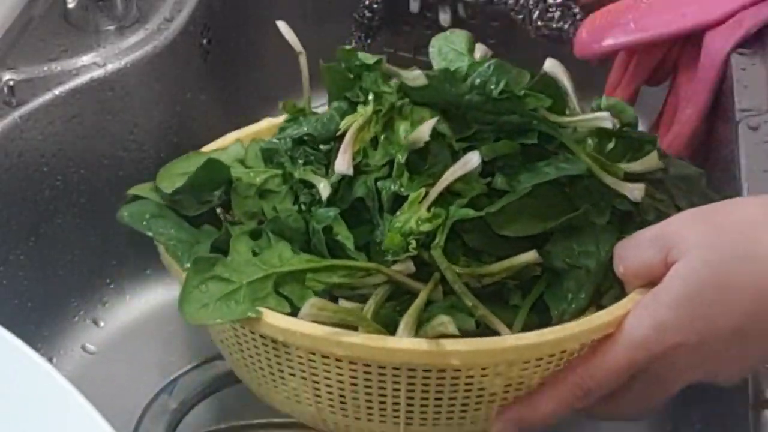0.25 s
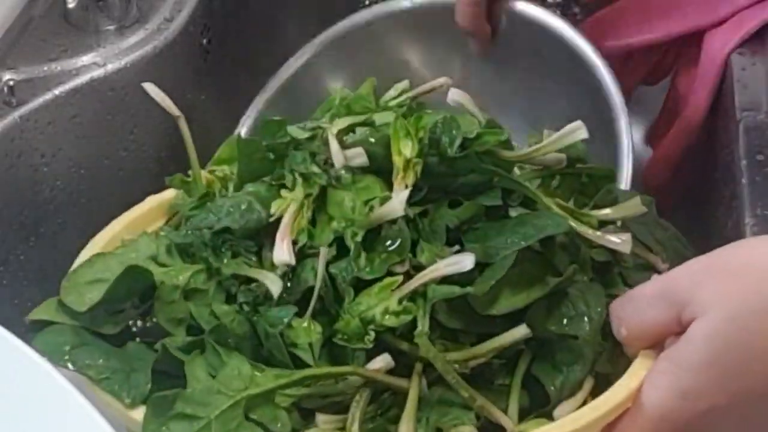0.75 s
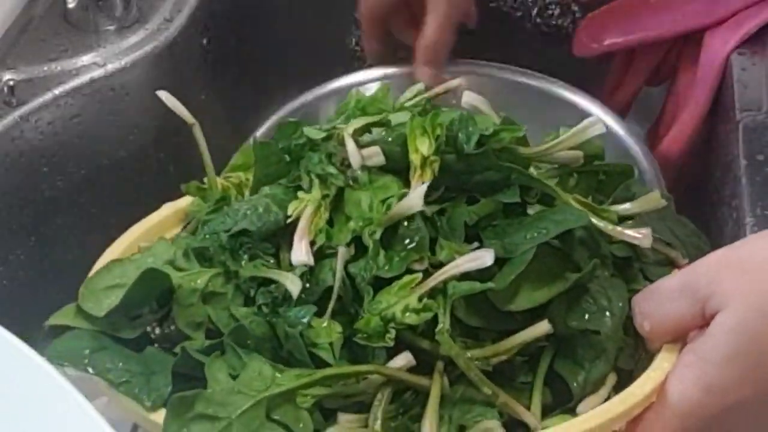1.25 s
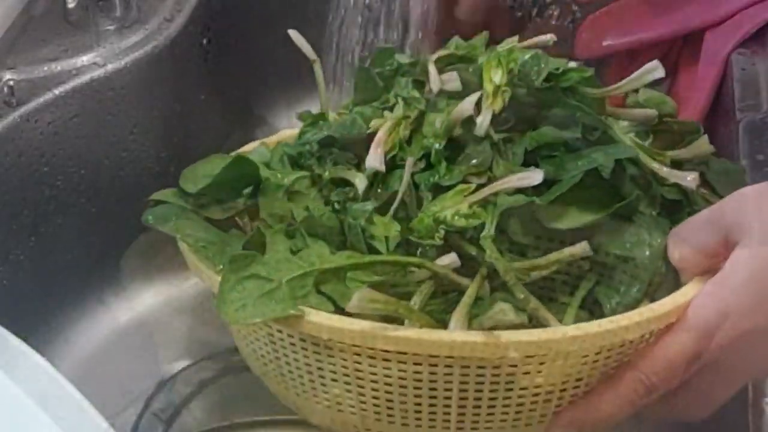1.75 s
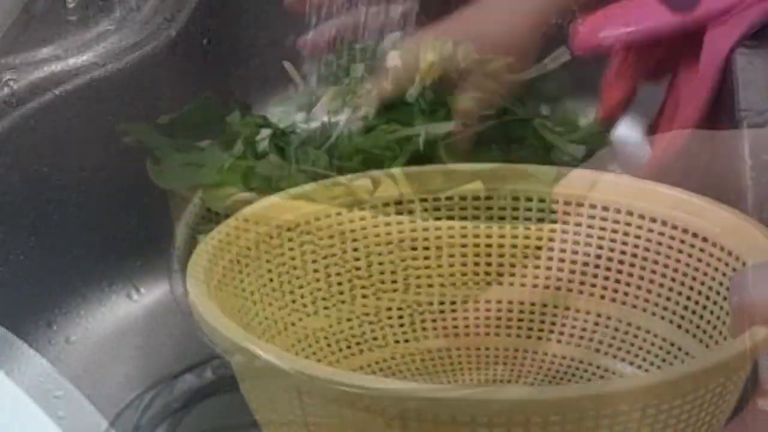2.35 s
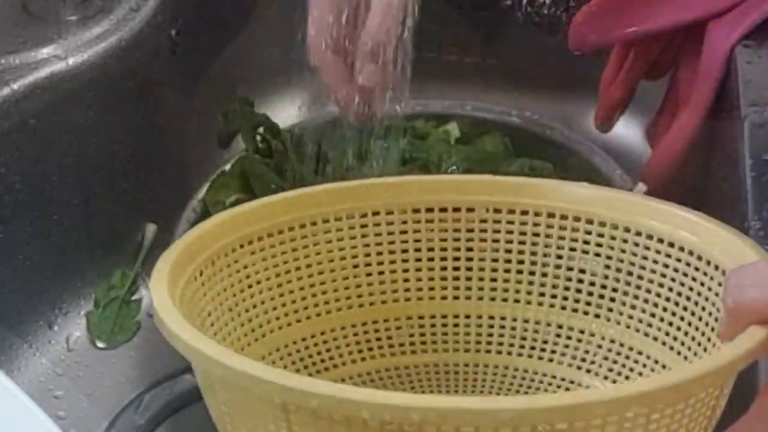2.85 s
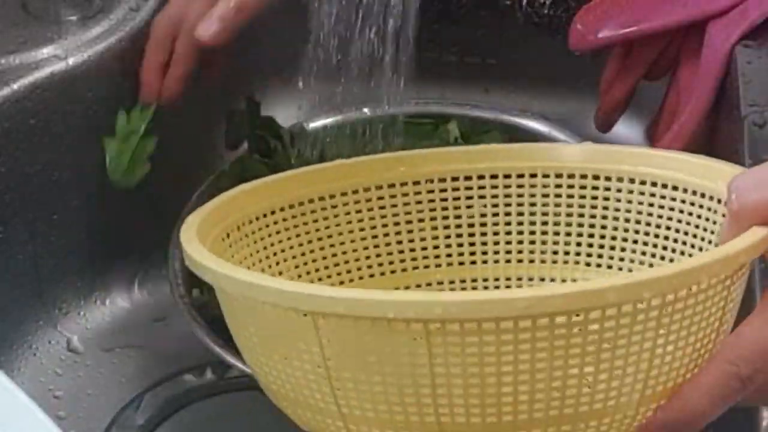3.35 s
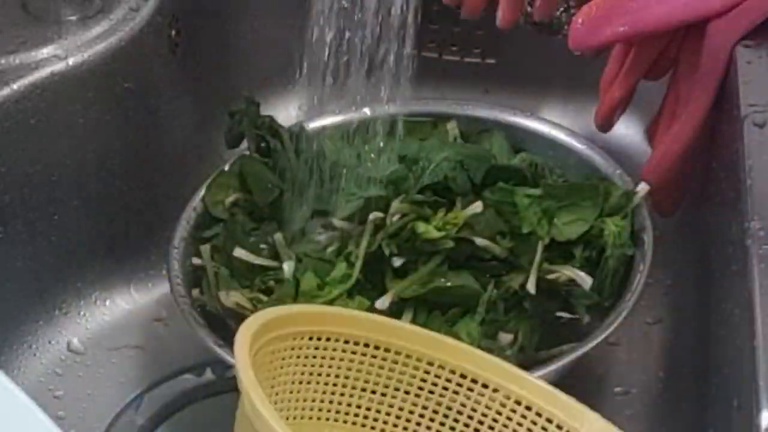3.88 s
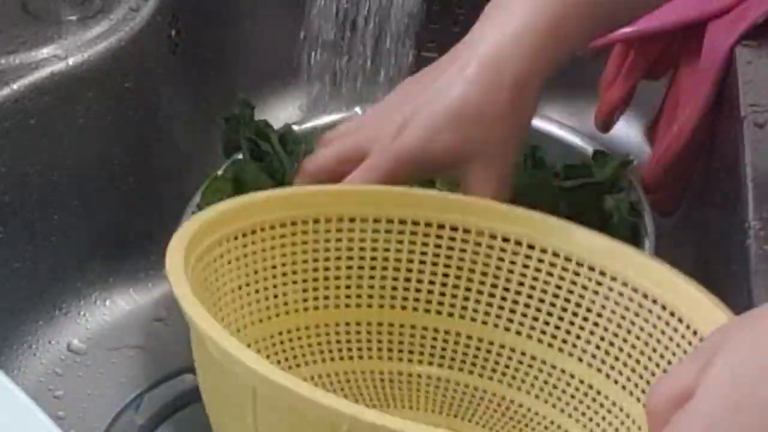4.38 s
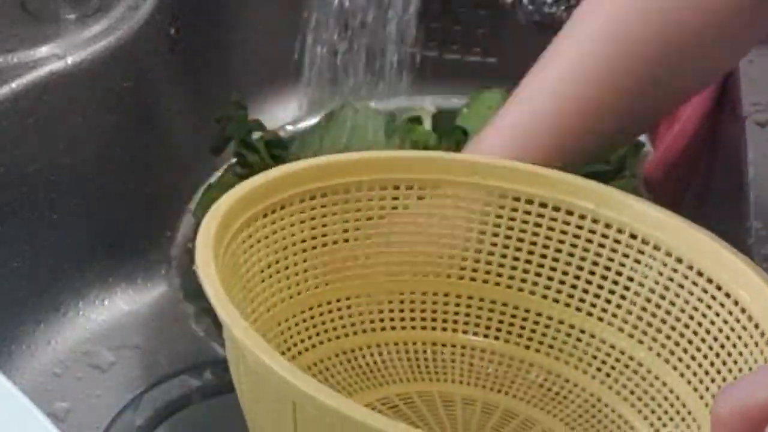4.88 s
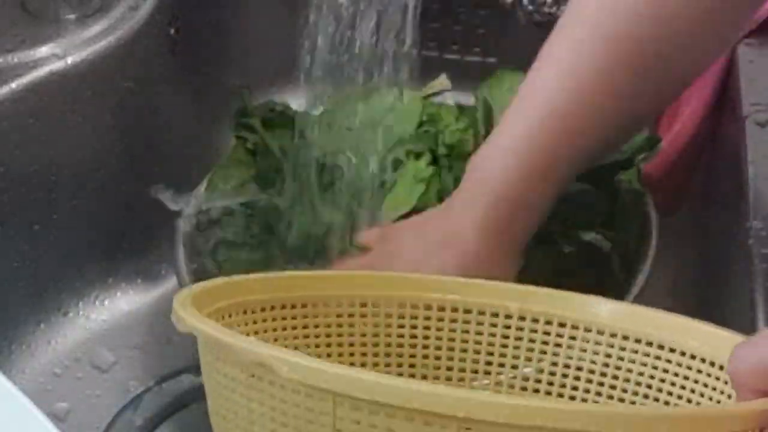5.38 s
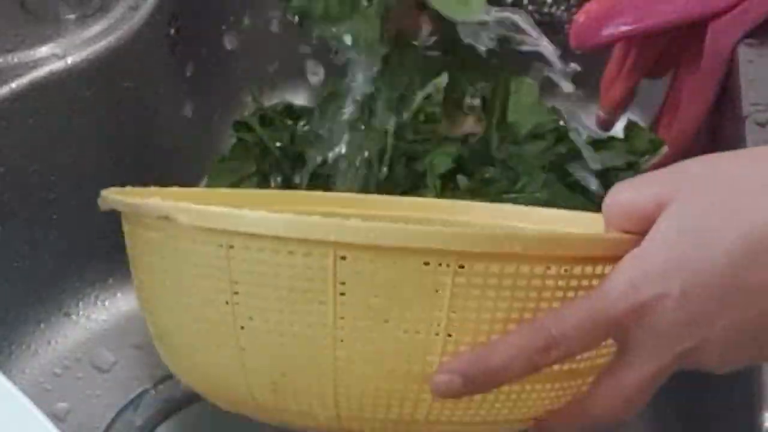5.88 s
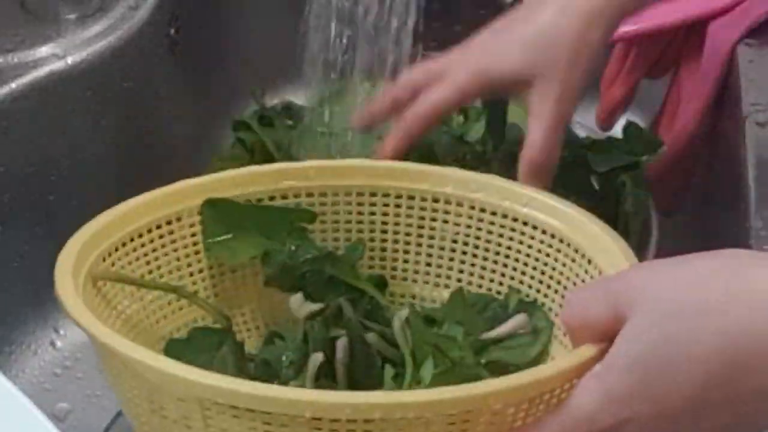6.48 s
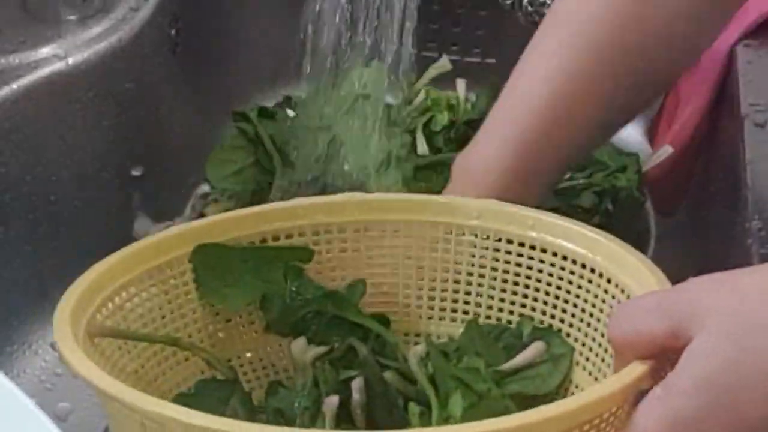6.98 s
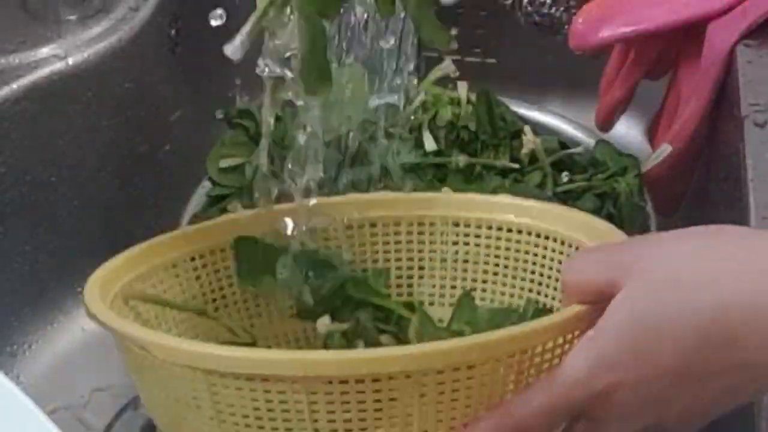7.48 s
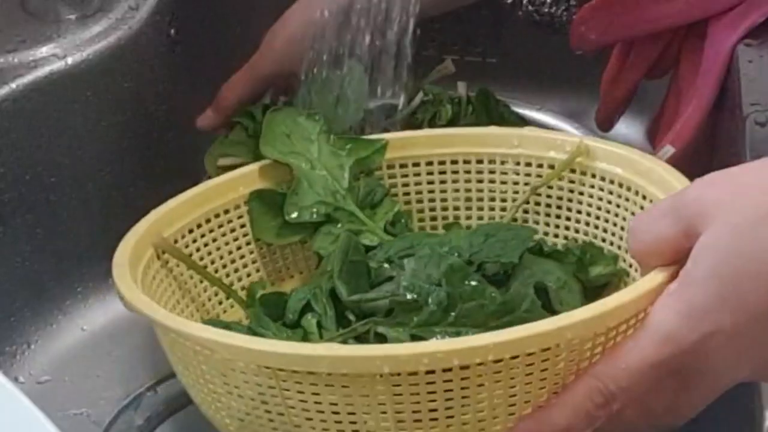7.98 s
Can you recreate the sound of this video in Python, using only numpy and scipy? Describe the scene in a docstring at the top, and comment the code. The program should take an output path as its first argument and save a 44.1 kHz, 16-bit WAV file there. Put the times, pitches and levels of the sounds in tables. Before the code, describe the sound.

Close in a kitchen sink: a splashing pour, hollow steel knocks, then steady tap spray with sloshing leaves, drips and plastic colander bumps.

```python
"""Kitchen: a tap sprays on leafy vegetables in a steel sink, close to a pair of microphones.
A steel bowl is tipped out and set down; then the spray runs, a hand stirs and lifts the leaves,
and the plastic colander drags and knocks on the basin, which booms under everything.
Water is shaped noise plus bursting bubbles; the steel is a bank of decaying modes; the squeak is a gliding tone."""
import sys
import numpy as np
from scipy import signal
from scipy.fft import rfft, irfft
from scipy.io import wavfile
from scipy.ndimage import uniform_filter1d

SR = 44100
rng = np.random.default_rng(int(sys.argv[2]) if len(sys.argv) > 2 else 0)


def output_pcm(signal):
    """Save a mono or channel-first signal as 16-bit PCM at the path in sys.argv[1].

    Samples are clipped to [-1, 1] before scaling.
    """
    pcm = np.clip(np.atleast_2d(signal).T, -1, 1) * 32767
    wavfile.write(sys.argv[1], SR, np.round(pcm).astype(np.int16))


def gain_from_db(level_db):
    """Convert decibel levels to linear amplitude factors (20 dB per decade)."""
    decades = np.asarray(level_db, float) / 20
    return 10 ** decades


N = 363384

# quiet hum of the kitchen: (frequency [Hz], level [dB])
ROOM_COLOUR = [(20, 2), (160, -13), (300, -18.5), (450, -30.5), (850, -28), (1250, -71), (6700, -44),
               (16000, -41)]
ROOM_DB = -51
# fine spray: (frequency [Hz], level [dB])
HISS_COLOUR = [(800, -25.5), (1500, -12.5), (3400, -6), (7200, -9.5), (8500, -3.5), (10000, -4.5),
               (13000, -4.5), (16000, -11)]
# sloshing and bubbling water: (frequency [Hz], level [dB])
SLOSH_COLOUR = [(150, -1), (400, 2), (900, -7.5), (1500, -6), (3000, -5), (5000, -7), (9000, -12.5),
                (16000, -13)]
# stereo likeness of noise: (frequency [Hz], left-right correlation [-1..1])
STEREO_LIKENESS = [(60, 1), (180, 0.9), (550, 0.82), (1650, 0.68), (4970, -0.11), (15000, 0.036)]
# microphone colour: (frequency [Hz], left over right [dB])
LEFT_OVER_RIGHT = [(60, -2), (180, -1.5), (550, 2.5), (1650, 1), (4970, 1), (15000, -2)]
TOP_EDGE_HZ = 15850  # top edge of the band: nothing sounds above it

# steel basin modes: (frequency [Hz], relative level [dB], t60 [s])
BASIN_MODES = [(43, -8, 0.079), (74, -0.5, 0.095), (99.6, 2.5, 0.19), (131.4, -1, 0.13),
               (159.4, -6.5, 0.058), (230, -1, 0.098), (300, 2, 0.096), (342, -3.5, 0.14),
               (416.7, 3.5, 0.067), (469, -2, 0.13), (593, 7.5, 0.029), (740, 1, 0.092), (870, 1.5, 0.039),
               (1092, -12.5, 0.15)]
DEEP_HZ, SWING_CYCLES = 190, 0.3  # modes below DEEP_HZ are the deep ones; time constant of the swing-up
# knocks on the basin, and deep booms that ring on after them:
# (time [s], level [dB], deep modes over the others [dB], favoured frequency [Hz])
KNOCKS = [(0.733, -20.5, -13, 258), (0.771, -15, -14, 190), (0.813, -17, -11.5, 198),
          (0.934, -28, -28, 424), (0.984, -21.5, -10, 228), (1.014, -17.5, -6, 289), (1.021, -22.5, 7, 300),
          (1.129, -29, -15, 430), (1.387, -21, -1, 275), (1.41, -37.5, 8, 300), (1.443, -43, 12.5, 300),
          (1.959, -24, -5, 376), (2.033, -22.5, -14, 204), (3.046, -15.5, -22, 300),
          (3.287, -28.5, -9, 444), (3.682, -19.5, -14, 318), (3.69, -21.5, -27, 400),
          (3.777, -25, -0.5, 366), (3.833, -29.5, -1, 221), (3.896, -14, -2.5, 398),
          (4.613, -29.5, -3, 225), (4.63, -29.5, 1.5, 348), (5.103, -32.5, -5, 496),
          (6.249, -37.5, -9, 282), (6.447, -30, -27, 270), (6.906, -26, -16, 240), (7.63, -34, -15, 293),
          (8.15, -27, -8.5, 210)]
# colander dragged over the steel: (time [s], level [dB])
DRAG_LEVEL = [(2.8, -46), (2.85, -25.5), (2.99, -30.5), (3.06, -23), (3.085, -51)]
# wet skin squeaks on plastic, sliding up in pitch
SQUEAK_S, SQUEAK_LENGTH_S, SQUEAK_DB, SQUEAK_HZ, SQUEAK_SLIDE_HZ = 4.618, 0.021, -25, 2286, 690

# drips and large air bubbles: (time [s], level [dB], pitch [Hz])
PLOPS = [(.028, -40, 1030), (0.034, -35.5, 1800), (0.044, -34, 4180), (.116, -37.5, 1350),
         (0.123, -42, 970), (0.176, -39, 3870), (0.242, -32.5, 2800), (.3, -33.5, 1850), (0.305, -39, 1140),
         (0.372, -35, 3420), (.708, -47, 1480), (1.128, -30.5, 430), (1.163, -22.5, 870), (1.179, -22, 696),
         (1.24, -27, 740), (1.2564, -26, 1050), (1.432, -42, 1330), (1.463, -35, 4200), (1.56, -42, 1410),
         (2.362, -29, 873), (5.134, -32.5, 1530), (5.212, -30.5, 1700), (5.652, -37, 1470),
         (6.701, -32, 1600), (6.845, -35, 2240), (7.057, -31, 5800), (7.075, -38, 654), (7.187, -27, 1360),
         (7.26, -39.5, 496), (7.289, -29, 1120), (7.38, -32, 870), (7.395, -31, 2600), (8.058, -34, 3980)]
# sheets of water slapping down: (time [s], level [dB], treble over the middle [dB], fade t60 [s])
SPLASHES = [(0.0288, -38, -18, 0.03), (0.047, -45, 9, 0.029), (0.1, -50, 18, 0.021),
            (0.1344, -44, -14, 0.14), (0.17, -36, -0.5, 0.068), (0.234, -37, 0, 0.051),
            (0.2992, -48, 7.5, 0.15), (0.3526, -48, 4.5, 0.09), (0.729, -25, 6.5, 0.045),
            (0.765, -30.5, 5, 0.076), (0.807, -14, -2.5, 0.066), (0.879, -19, -25, 0.051),
            (0.9165, -28, 2, 0.056), (0.9616, -29.5, 7, 0.068), (0.983, -18.5, -13, 0.13),
            (1.011, -8, 1, 0.032), (1.152, -28, -5, 0.2), (1.255, -25, 0, 0.022), (1.366, -25, -4.5, 0.15),
            (1.384, -21, -26, 0.069), (1.4626, -46, 5.5, 0.08), (1.562, -41, 1, .06),
            (1.5823, -38.5, 6, 0.068), (1.947, -34.5, 1, 0.36), (2.068, -36.5, -6, 0.51),
            (2.35, -34.5, -15, 0.19), (2.74, -34, -14, 0.31), (3.676, -25, -12, 0.065),
            (3.775, -24, -3, 0.086), (3.891, -15.5, -20, 0.045), (4.621, -36.5, -2, 0.52),
            (5.63, -35, -8, 0.13), (6.87, -30.5, 9.5, 0.074)]
SPLASH_RISE_S, SHEET_DB = 0.01, -25  # rise time constant of a sheet at SHEET_DB
SWELL_PER_DB = 0.57  # a bigger sheet swells more slowly: dB of rise time per dB above SHEET_DB
SPLASH_HOLD = 1.195  # power of time in the fade: above 1 the sheet holds, then breaks up
# single drops cracking on steel: (time [s], level [dB])
TICKS = [(0.3974, -26), (2.177, -25.5), (2.338, -37), (6.876, -48)]
TICK_T60_S = 0.024

# running water: (time [s], spray hiss [dB], sloshing and trickling [dB])
WATER_LEVELS = [(1.56, -60, -70), (1.58, -48, -43), (1.65, -34.5, -38), (1.85, -39, -43.5),
                (2.2, -35, -40.5), (2.43, -35.5, -34), (2.75, -36.5, -40), (2.83, -40, -39),
                (3.27, -46.5, -47), (3.62, -42.5, -47), (3.86, -42.5, -45), (4.2, -44.5, -52.5),
                (4.39, -39.5, -43), (4.58, -44.5, -46), (4.82, -41.5, -44), (5.03, -37.5, -38),
                (5.67, -36, -37), (6.0, -37, -48), (6.23, -36, -49), (6.35, -34, -42), (6.72, -36, -39),
                (7.06, -37, -38), (7.3, -35, -35.5), (7.58, -35.5, -39), (8.24, -35, -42)]
# water tipped from the bowl: (time [s], level [dB])
POUR_LEVEL = [(0, -49.5), (.22, -54), (.48, -64), (.54, -75), (.69, -73), (.8, -43), (1.0, -34.5),
              (1.28, -44.5), (1.35, -54.5), (1.55, -49.5)]
# falling water drums the basin: (time [s], level [dB])
DRUMMING_LEVEL = [(0, -50.5), (.7, -47.5), (.94, -32), (1.17, -46), (1.5, -40), (2.7, -43), (3.2, -51.5),
                  (3.85, -41), (4.15, -51), (5.23, -45.5), (8.24, -46.5)]
# filled bowl hums under the spray: (time [s], level [dB])
BOWL_LEVEL = [(2.5, -65), (6.25, -59.5), (6.4, -50.5), (7.4, -57), (8.24, -44)]
# notes of the filled bowl: (frequency [Hz], width [Hz], relative level [dB])
BOWL_NOTES = [(890, 100, 0), (1420, 160, -1)]
# short dips in the level of the running water: (time [s], depth [dB], half length [s])
WATER_DIPS = [(2.24, -1.5, 0.095), (2.525, -6.5, 0.062), (4.946, -8, 0.11), (5.513, -7, 0.034),
              (5.62, -8, 0.017), (5.91, -4.5, 0.16), (6.292, -19, 0.03), (6.875, -9.5, 0.13),
              (7.477, -6.5, 0.13)]
HISS_SHARE = 0.63  # the hiss dips by this share of the depth
LEAF_CUT_HZ = 720  # leaves soak up the low wash under the spray


def evened(x):
    """Scales to unit rms."""
    return x / np.sqrt(np.mean(x ** 2) + 1e-20)


def read(points, hz):
    """Interpolates a table over log frequency."""
    f, value = np.transpose(points)
    return np.interp(np.log(hz + 1), np.log(f + 1), value)


def curves(rows):
    """Each dB column as a gain over time, silent before the table and fading at 400 dB/s after it."""
    s, *columns = np.transpose(rows)
    t = np.arange(N) / SR
    fade_db = 400 * np.maximum(t - s[-1], 0)
    return [gain_from_db(np.interp(t, s, column, -200) - fade_db) for column in columns]


def add(mix, s, sound):
    """Adds a sound into the mix at s seconds, cut at the end."""
    part = mix[..., round(s * SR):][..., :sound.shape[-1]]
    part += sound[..., :part.shape[-1]]


def ringing(drive, response):
    """Convolves a drive with an impulse response, cut to N samples."""
    return signal.oaconvolve(drive, response, axes=1)[:, :N]


def highpass(x, order, hz):
    """Butterworth high-pass."""
    return signal.lfilter(*signal.butter(order, hz, "high", fs=SR), x)


def noise(colour, patchy_db, flicker_db):
    """Random short-time spectra with loud and soft patches and a flicker shared by all bands."""
    frames, hz = N // 128 + 5, np.fft.rfftfreq(512, 1 / SR)
    a, b, c, d, patches = rng.standard_normal((frames, 257, 5)).T
    flicker = evened(uniform_filter1d(patches.mean(0), size=5))
    patches = uniform_filter1d(patches, size=9, axis=0)  # over frequency
    patches = evened(uniform_filter1d(patches, size=14, axis=1))  # over time
    same = np.clip(read(STEREO_LIKENESS, hz), -1, 1)[:, None]
    left = a + 1j * b
    right = same * left + np.sqrt(1 - same ** 2) * (c + 1j * d)
    level_db = read(colour, hz)[:, None]
    gain = gain_from_db(level_db + patchy_db * patches + flicker_db * flicker)
    spectra = np.array([left, right]) * gain
    return evened(signal.istft(spectra, nperseg=512, noverlap=384)[1][:, :N])


def basin(deep_db, spot_hz=350, focus_db=0):
    """The steel's response: each mode swings up, then decays; the high modes differ left and right."""
    t, out = np.arange(SR // 3) / SR, 0
    for k, (hz, db, t60) in enumerate(BASIN_MODES):
        if hz < DEEP_HZ:
            db = db + deep_db
        else:
            db = db - min(focus_db * abs(np.log2(hz / spot_hz)), 17)
        swing = gain_from_db(db - 60 * t / t60) * (1 - np.exp(-t * hz / SWING_CYCLES))
        phase = (2.4 if hz > DEEP_HZ else -1.4) * k
        stereo_phase = np.array([[0], [(-1) ** k * hz / 1300]])
        out = out + swing * np.sin(2 * np.pi * hz * t + phase + stereo_phase)
    return out


def bubble(hz, cycles, glide):
    """A bubble rings like a spring and rises in pitch as it nears the surface."""
    u = np.arange(0, 3 * cycles, hz / SR) / cycles
    envelope = (1 - np.exp(-u / 0.13)) * np.exp(-2.2 * u)
    return envelope * np.sin(2 * np.pi * cycles * (u + glide * u ** 2))


def bubbles(low_hz, high_hz, per_s, cycles, spread_db, count):
    """Many bubble sizes, each bursting at random, near one microphone or the other."""
    out = np.zeros((2, N))
    for hz in np.geomspace(low_hz, high_hz, count):
        when, size, sign = rng.random((3, 2, N))
        bursts = when < per_s / count / SR
        train = bursts * gain_from_db(-spread_db * np.log(size + 0.035)) * np.sign(sign - 0.5)
        out += ringing(train, bubble(hz, cycles, 0.1)[None] * gain_from_db(read(SLOSH_COLOUR, hz)))
    return evened(out + 0.018 * out[::-1])  # slight leak to the other side


def room_hum():
    """Quiet hum of the kitchen: steady, mostly low noise."""
    return gain_from_db(ROOM_DB) * noise(ROOM_COLOUR, patchy_db=1.5, flicker_db=0.6)


def squeak():
    """A gliding tone with its octave, roughened by the skin catching and slipping."""
    u, out = np.arange(0, 1, 1 / (SQUEAK_LENGTH_S * SR)), np.zeros(N)
    wobble = evened(uniform_filter1d(rng.standard_normal(SR // 10), size=30))[:len(u)]
    pitch_hz = SQUEAK_HZ + SQUEAK_SLIDE_HZ * u + 150 * wobble
    phase = 2 * np.pi * np.cumsum(pitch_hz) / SR
    tone = np.sin(phase) + 0.26 * np.sin(2 * phase)
    add(out, SQUEAK_S, gain_from_db(SQUEAK_DB) * np.sin(np.pi * u) * tone)
    return out


def drag():
    """Soft plastic feet stick and slip at random, shaking mostly the lower modes."""
    slips = (rng.random(N) < 350 / SR) * rng.standard_normal(N)
    scrape = ringing(slips[None], basin(-6.5, 260, focus_db=15))
    return curves(DRAG_LEVEL)[0] * evened(scrape)


def plops():
    """A large bubble and the smaller swarm it breaks into; the steel walls throw them back for a moment."""
    out, t = np.zeros(N), np.arange(SR // 10) / SR
    swarms = rng.random((len(PLOPS), 8, 2))
    for (s, db, hz), swarm in zip(PLOPS, swarms):
        add(out, s, gain_from_db(db) * bubble(hz, cycles=5 + hz / 250, glide=0.007))
        for late, size in swarm:
            small = bubble(hz * (0.85 + 0.6 * size), cycles=7, glide=0.05)
            add(out, s + 0.035 * late, gain_from_db(db - 12) * small)
    walls = rng.standard_normal((2, len(t))) * gain_from_db(-60 * t / 0.028)
    walls = walls / np.linalg.norm(walls[0])
    return out + gain_from_db(7.0) * ringing(out[None], walls)


def knocks():
    """Knocks and the deep booms after them sound the same basin modes, each with its own weighting."""
    out = np.zeros((2, N))
    for s, db, deep_db, spot_hz in KNOCKS:
        add(out, s, gain_from_db(db - 2.5) * basin(deep_db, spot_hz, focus_db=26.0))
    return out


def splashes():
    """A fast swell of froth and spray that fades as the sheet breaks up; single drops crack in the treble."""
    t = np.arange(SR // 2) / SR
    body, top, ticks = np.zeros((3, N))
    for s, db, treble_db, t60 in SPLASHES:
        rise_s = SPLASH_RISE_S * gain_from_db(SWELL_PER_DB * (db - SHEET_DB))
        fade = gain_from_db(db - 60 * (t / max(t60, 0.02)) ** SPLASH_HOLD)
        shape = fade * (1 - np.exp(-t / rise_s))
        add(body, s, shape)
        add(top, s, shape * gain_from_db(treble_db))
    for s, db in TICKS:
        add(ticks, s, gain_from_db(db - 60 * t / TICK_T60_S))
    spray = noise(HISS_COLOUR, patchy_db=3, flicker_db=2)
    froth = noise(SLOSH_COLOUR, patchy_db=3, flicker_db=1.5)
    froth = froth + gain_from_db(4) * bubbles(900, 6500, per_s=1500, cycles=11, spread_db=4, count=14)
    return body * evened(froth) + top * spray + ticks * highpass(spray, 2, 6500)


def drumming():
    """Falling water strikes the basin as dense noise; its ring is shortened by 140 dB/s."""
    damping = gain_from_db(-np.arange(SR // 3) / SR * 140)
    boom = ringing(rng.standard_normal((1, N)), basin(12.9) * damping)
    return curves(DRUMMING_LEVEL)[0] * evened(boom)


def bowl_hum(wash):
    """The wash excites the resonances of the filled bowl."""
    notes = 0
    for hz, width_hz, db in BOWL_NOTES:
        notes = notes + gain_from_db(db) * signal.lfilter(*signal.iirpeak(hz, hz / width_hz, SR), wash)
    return curves(BOWL_LEVEL)[0] * evened(notes)


def fine_spray():
    """Hissing noise with a sprinkle of tiny bubbles."""
    tiny = bubbles(5920, 15300, per_s=590, cycles=6.1, spread_db=9, count=6)
    return noise(HISS_COLOUR, patchy_db=1.5, flicker_db=1.8) + gain_from_db(-16.5) * tiny


def washing():
    """Stirred and poured water: rushing noise and bursting bubbles."""
    burble = bubbles(1000, 5000, per_s=700, cycles=12, spread_db=4.2, count=22)
    return noise(SLOSH_COLOUR, patchy_db=1.8, flicker_db=0.4) + gain_from_db(-4) * burble


def dips_db():
    """The level falls and returns in a straight V at each dip."""
    t = np.arange(N) / SR
    return sum(db * np.maximum(1 - abs(t - s) / half_s, 0) for s, db, half_s in WATER_DIPS)


def water():
    """Fine spray hisses; stirred and poured water washes and bubbles; all of it drums the basin."""
    dips = gain_from_db(np.outer([HISS_SHARE, 1], dips_db()))
    hiss_gain, slosh_gain = curves(WATER_LEVELS) * dips
    wash = washing()
    slosh = slosh_gain * evened(highpass(wash, 1, LEAF_CUT_HZ))
    pour = curves(POUR_LEVEL)[0] * evened(wash)
    return drumming() + bowl_hum(wash) + pour + slosh + hiss_gain * fine_spray()


def scene():
    """All sources over the quiet hum of the kitchen."""
    return room_hum() + squeak() + drag() + plops() + knocks() + splashes() + water()


def roll_off(x):
    """The treble ends steeply here."""
    return signal.sosfilt(signal.butter(12, 17060, fs=SR, output="sos"), x)


def record(dry):
    """The two microphones differ a little in colour; nothing passes above the top edge."""
    hz = np.fft.rfftfreq(N, 1 / SR)
    colour = gain_from_db(np.outer([0.5, -0.5], read(LEFT_OVER_RIGHT, hz)))
    mix = irfft(rfft(dry) * colour * (hz < TOP_EDGE_HZ), N)
    return roll_off(mix)


dry = scene()
out = record(dry)
output_pcm(out)
```